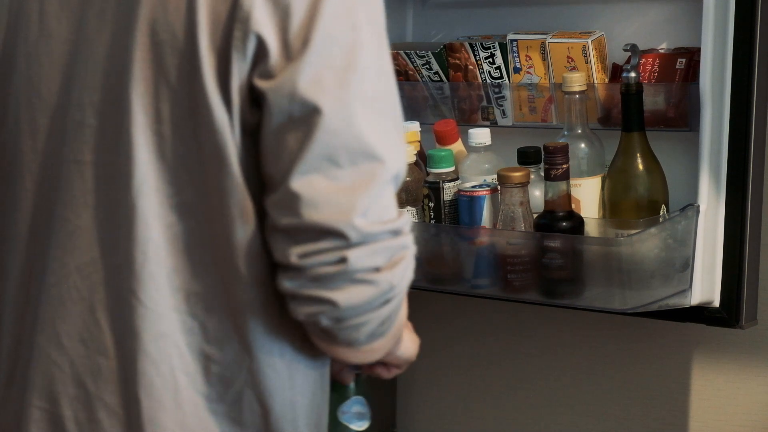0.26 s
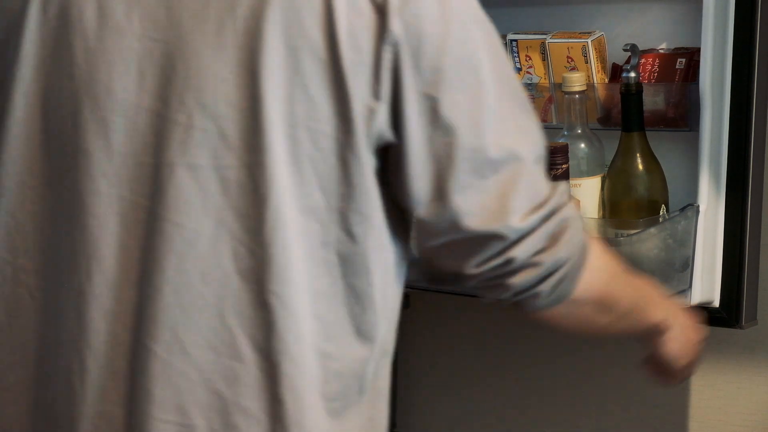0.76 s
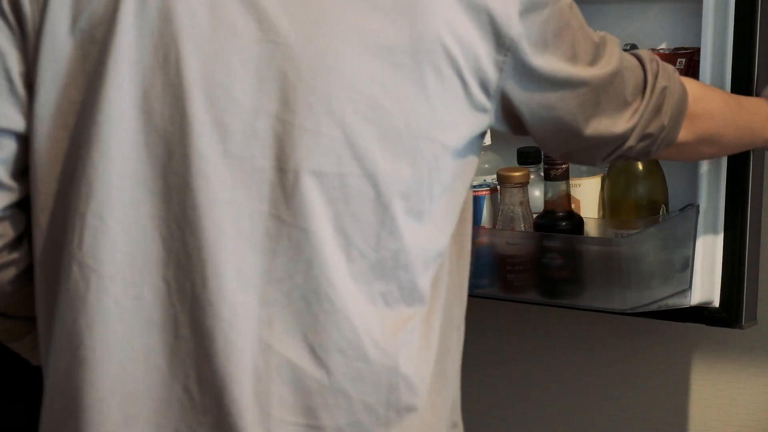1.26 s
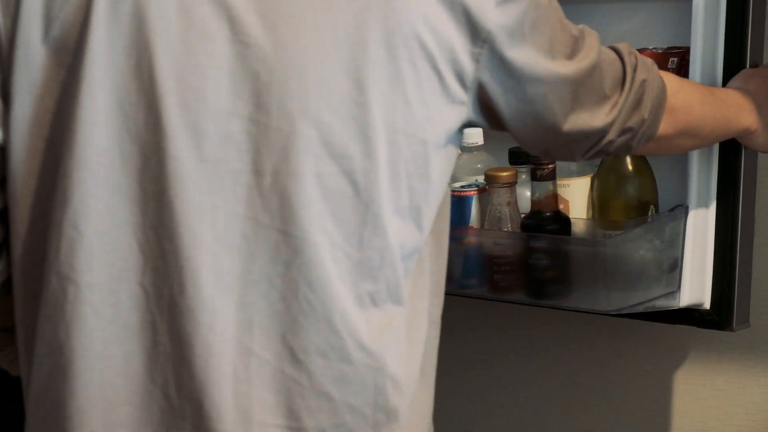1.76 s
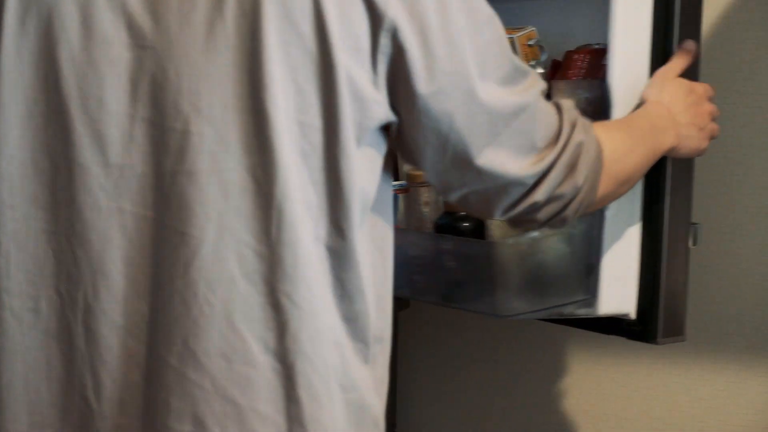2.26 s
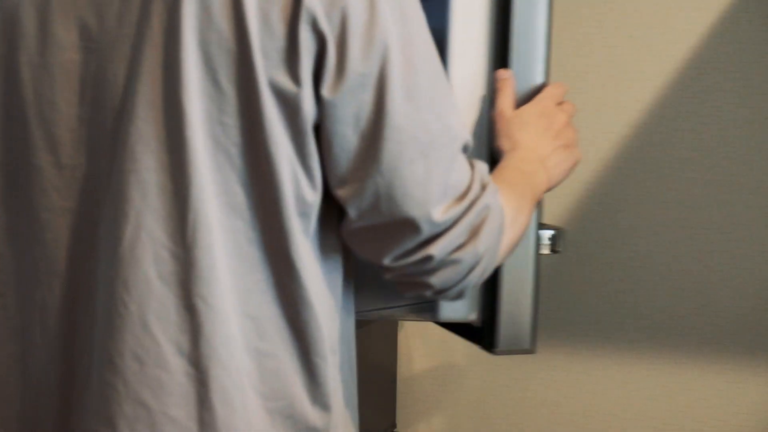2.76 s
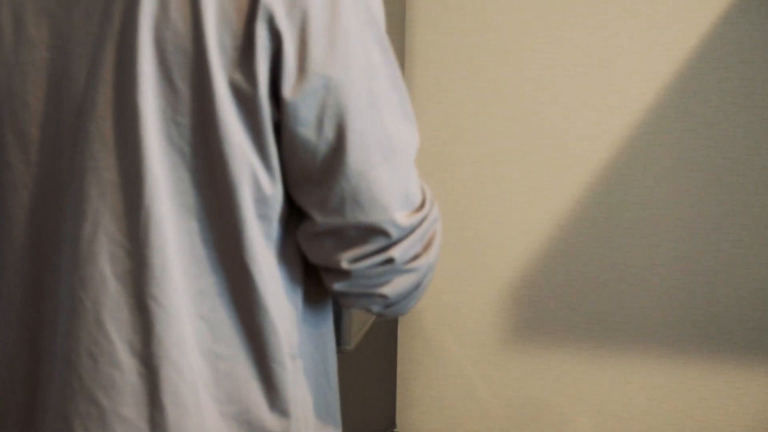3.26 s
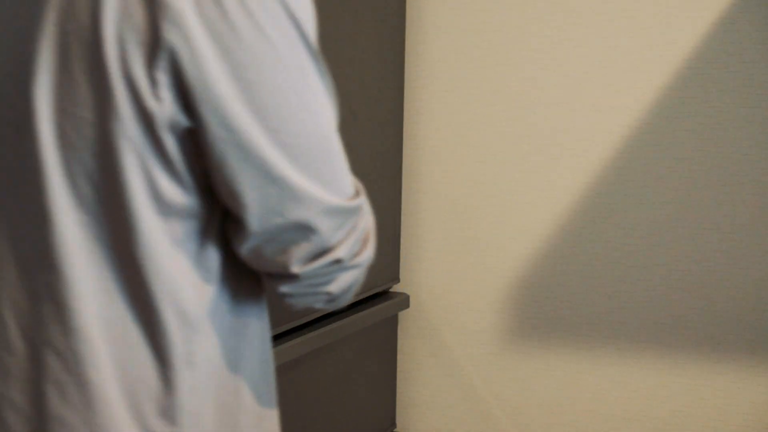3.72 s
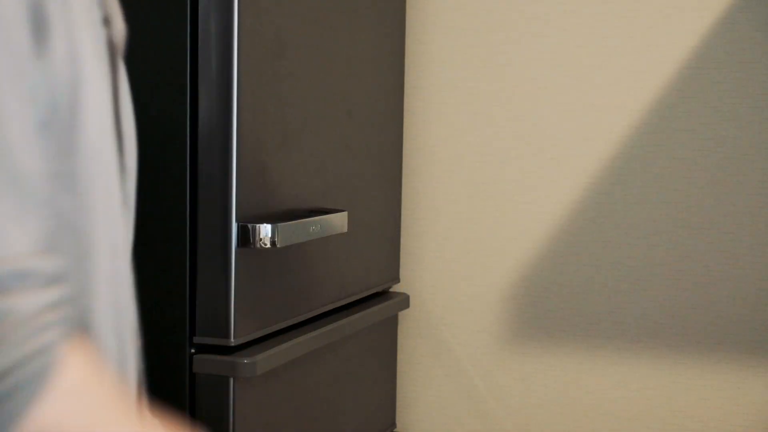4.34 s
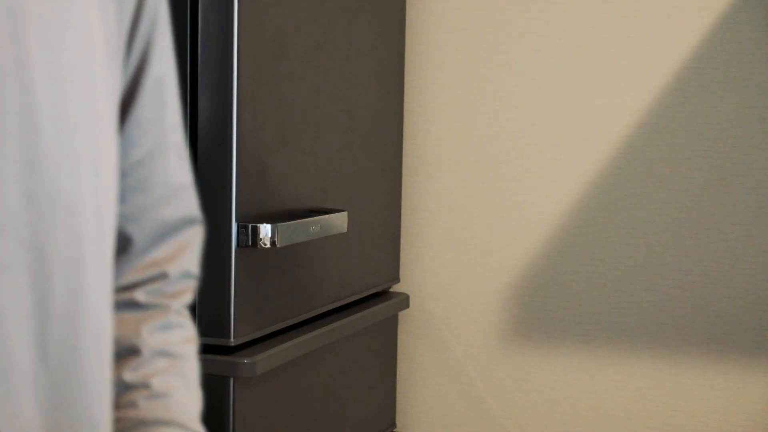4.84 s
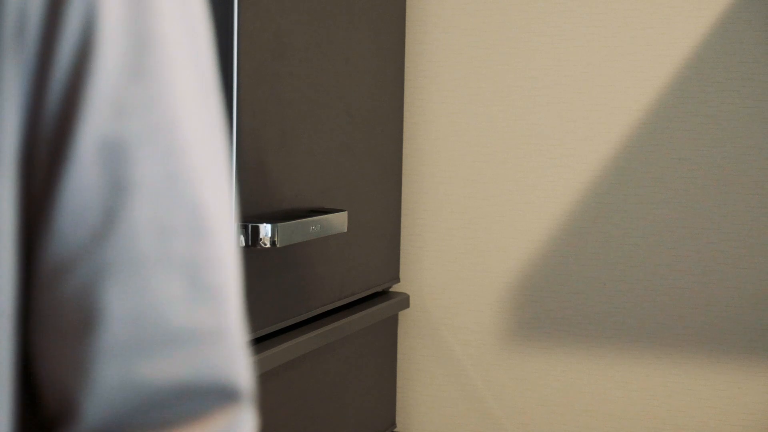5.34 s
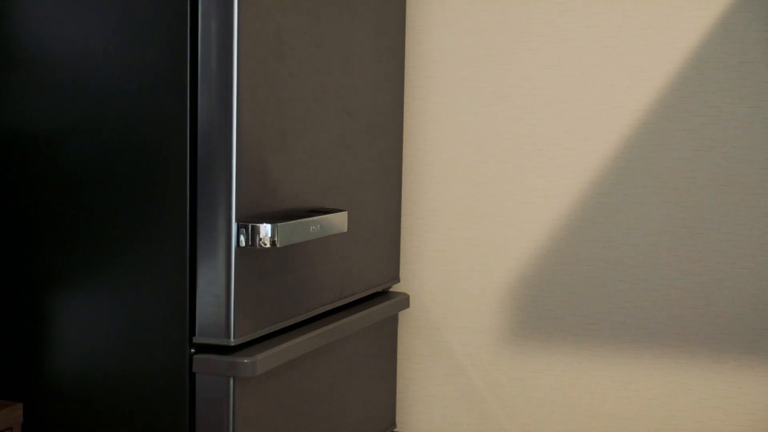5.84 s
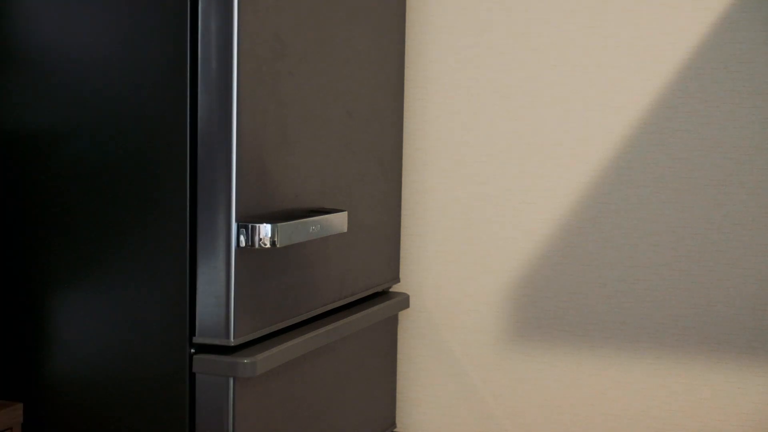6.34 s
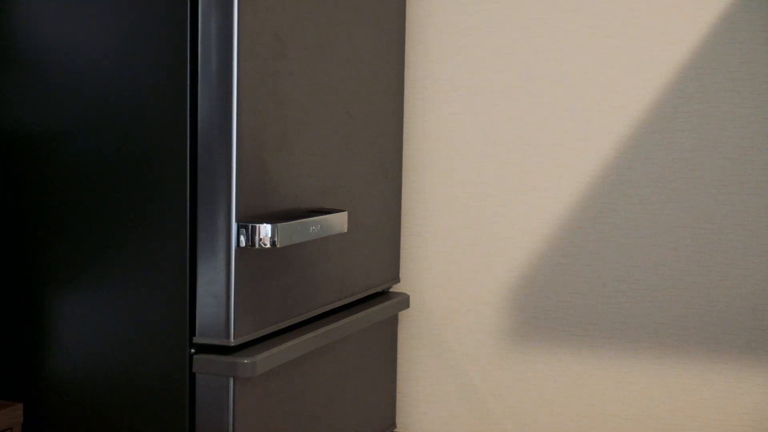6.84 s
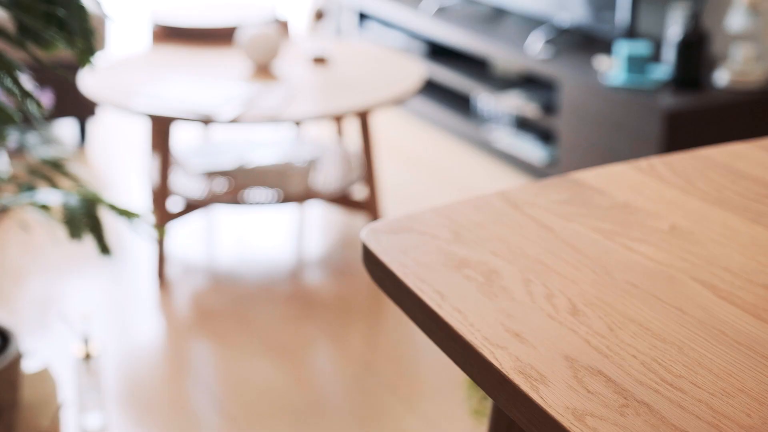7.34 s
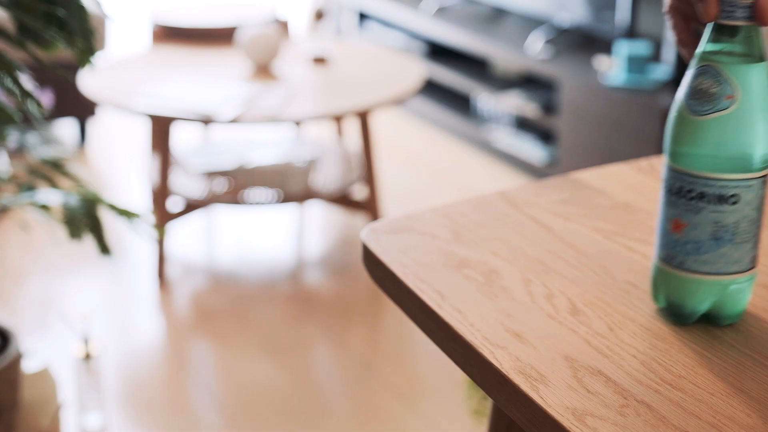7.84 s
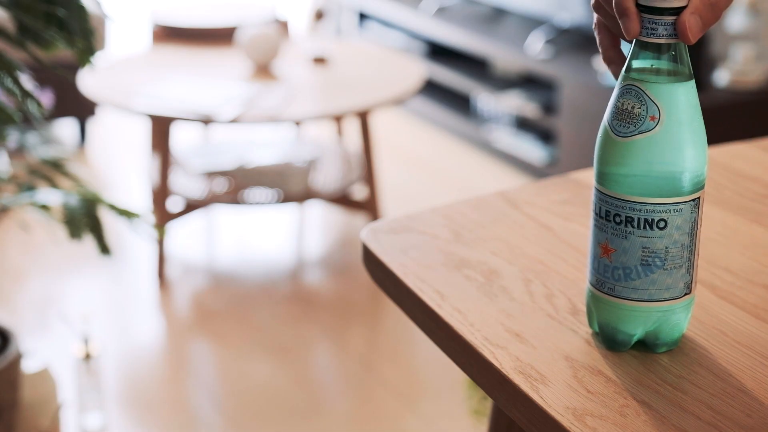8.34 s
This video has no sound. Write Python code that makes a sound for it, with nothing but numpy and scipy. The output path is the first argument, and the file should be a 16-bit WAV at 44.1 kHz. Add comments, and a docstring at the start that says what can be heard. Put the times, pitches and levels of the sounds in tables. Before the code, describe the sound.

Bottle clinks with short glassy rings open the scene, recorded close indoors over soft room tone. More clinks lead into a scraping seal, bright door clacks and a deep cabinet thud with a short boom. Skin squeaks briefly off the door, then come a dull footstep, faint rustling, low air rumble and a dry creak. The room tone becomes louder and hissier as a filled plastic bottle hits a wooden table with a low double thump; muffled bumps end it.

```python
"""Bottles knock in the shelf of a refrigerator door; the door swings to, clacks against its frame and thuds shut.
A hand rubs off the door, then dull bumps, a footstep and rustling clothes sound over a faint hum.
In a second, hissier room a full plastic bottle lands on a wooden table, and dull bumps follow.
Knocks are clicks with dense reflections plus ringing tones that die away; rubbing, rumble and
room tone are shaped noise; the hum is two unsteady sine tones."""
import sys
import numpy as np
from scipy import signal
from scipy.fft import rfft, irfft
from scipy.io import wavfile

SR = 44100
rng = np.random.default_rng(int(sys.argv[2]) if len(sys.argv) > 2 else 0)


def dump_mix(stems):
    """Bounce the given channels to the path in sys.argv[1] as a 16-bit WAV at rate SR."""
    frames = np.atleast_2d(stems).T  # one column per channel
    limited = np.clip(frames, -1, 1)  # hard clip at full scale
    pcm = np.round(limited * 32767).astype(np.int16)
    wavfile.write(sys.argv[1], SR, pcm)


N = 378060
SIZE = 32768  # samples in one short sound
AGE = np.arange(SIZE) / SR  # seconds since a short sound began
FREQ = np.maximum(np.fft.rfftfreq(SIZE, 1 / SR), 1)  # Hz, kept above zero for the logarithms
TIME = np.arange(N) / SR  # seconds since the scene began
FULL_FREQ = np.maximum(np.fft.rfftfreq(N, 1 / SR), 1)  # Hz, for sounds as long as the scene

# Tone colour of hard contact at the door. Each row: frequency in Hz, level in dB.
CLACK_COLOUR = [(90, -8.5), (160, -9.5), (420, -7.5), (1600, -9.5), (2800, -11), (4900, -12.5),
                (6300, -16.5), (8300, -14.5), (15000, -37)]


def undb(db):
    """Turn dB into a plain factor."""
    return 10 ** (np.asarray(db) / 20)


def level(x, db):
    """Scale a steady sound to an rms level."""
    return x * undb(db) / np.sqrt(np.mean(x ** 2))


def blow(x, db):
    """Scale a short sound: its energy spread over a twentieth of a second has this level."""
    return x * undb(db) / np.sqrt(np.sum(x ** 2) * 20 / SR)


def add(out, s, x):
    """Mix x into out from time s (seconds)."""
    start = max(int(s * SR), 0)
    out[start:start + len(x)] += x[:max(N - start, 0)]


def curve(points, hz=FREQ):
    """Join (Hz, dB) points by straight lines on a log-frequency axis."""
    point_hz, point_db = np.transpose(points)
    return np.interp(np.log(hz), np.log(point_hz), point_db)


def edge(ratio, slope):
    """dB of a filter edge at ratio 1: a positive slope (dB per octave) cuts above it, a negative one below."""
    return -10 * np.log10(1 + ratio ** (slope / (10 * np.log10(2))))


def peaks(modes, width_hz):
    """Height 0-1 of an object's resonances at each frequency."""
    return np.max([np.exp(-.5 * ((FREQ - hz) / width_hz) ** 2) for hz, *_ in modes], axis=0)


def colour(x, db):
    """Filter x to the given dB at each frequency, without any sound ahead of its cause."""
    # folding the cepstrum (the spectrum of the log spectrum) makes the filter minimum-phase
    cepstrum = irfft(np.log(undb(db - db.max()) + 1e-4))
    cepstrum[1:SIZE // 2] *= 2
    cepstrum[SIZE // 2 + 1:] = 0
    return irfft(rfft(x, SIZE) * np.exp(rfft(cepstrum)))


def fade(t60):
    """Exponential decay, 60 dB down after t60 seconds."""
    return np.exp(-np.log(1000) * AGE / max(t60, 1e-3))


def ring(modes, scatter_db=0, detune=0):
    """Ringing tones that die away; a blow may shift their levels and pitches at random."""
    chance = rng.standard_normal((len(modes), 2))
    total = 0
    for (hz, db, t60), (level_chance, pitch_chance) in zip(modes, chance):
        tone = np.sin(2 * np.pi * hz * (1 + detune * pitch_chance) * AGE)
        total = total + undb(db + scatter_db * level_chance) * fade(t60) * tone
    return total


def click_in_room(room_db, build_s=0.0012, bend_s=0.000536, t60=0.27, bass_t60=0.37, bass_hz=330):
    """A click on a panel and its dense reflections; the bass lingers longest."""
    noise = rng.standard_normal(SIZE)
    bass = irfft(rfft(noise) / (1 + (FREQ / bass_hz) ** 4))
    tail = (noise - bass) * fade(t60) + bass * fade(bass_t60)
    tail = tail * (1 - np.exp(-AGE / build_s))
    # bending waves carry the treble faster: 1 kHz arrives after bend_s, lower tones later
    click = irfft(np.exp(-4j * np.pi * bend_s * np.sqrt(FREQ * 1000)))
    return blow(click, 0) + blow(tail, room_db)


def soft_blow(modes, swell_s, scuff_db):
    """A soft push swells into low resonances, with a scuff at the contact."""
    # Tone colour of the scuff. Each row: frequency in Hz, level in dB.
    scuff_colour = [(50, 1.5), (150, 3.5), (330, -1), (450, -10), (780, -5), (1050, -17), (4000, -33),
                    (12000, -43)]
    swell = 1 - np.exp(-(AGE / swell_s) ** 2)
    tones = blow(swell * ring(modes), 0)
    scuff = swell * colour(click_in_room(room_db=21), curve(scuff_colour))
    return tones + blow(scuff, scuff_db)


def scrape(modes, swell_s, t60, hiss_db, grain_db=5):
    """A short run of uneven slips that swells, dies away and rings the given modes."""
    slips, sizes = rng.standard_normal((2, SIZE))
    force = slips * undb(grain_db * sizes) * (1 - np.exp(-AGE / swell_s)) * fade(t60)
    rung = signal.fftconvolve(force, ring(modes))[:SIZE]
    hiss = colour(force, curve(CLACK_COLOUR))
    return blow(rung, 0) + blow(hiss, hiss_db)


def walk(rate):
    """Slow random drift with a spread near 1, through rate random points a second."""
    knots = rng.standard_normal(1024)
    return np.interp(TIME * rate, np.arange(len(knots)), knots)


def bottles(ring_db=-4, tilt_hz=1100, tilt_slope=6, low_slope=55, peak_db=4):
    """A bottle touches with a thin tick, then lands fully; bottle and loaded shelf ring along."""
    # Knocks in the door shelf. Each row: start in seconds, level in dB, low edge in Hz, top edge in Hz,
    # slope beyond the top edge in dB per octave (a negative one thins the tones below it instead),
    # pitch of the bottle's body in Hz, its upper ring in Hz,
    # level of the bottle's ring in dB, level of the first touch in dB (both relative to the knock).
    knocks = [(0.1416, -33, 215, 1900, 45, 883, 1390, -3, -8),
              (0.431, -63, 700, 1500, -5, 1120, 1800, -1, -11),
              (1.06, -64, 900, 2400, 15, 1490, 2100, -6, -2),
              (1.386, -36.5, 450, 4500, 26, 1600, 2630, -8, -6),
              (1.389, -32.5, 470, 4700, 25, 1030, 1590, -6, -8),
              (2.746, -40, 720, 1090, 15, 1045, 1136, 2, -19),
              (3.3221, -30.5, 227, 2250, 26, 810, 1039, -3, -7.5),
              (3.6305, -27.5, 258, 1550, 18, 815, 1215, 3, -19.5),
              (3.6932, -37.5, 400, 2500, 6, 1475, 1810, -4, -10),
              (3.715, -43.5, 900, 2800, 2.5, 1470, 1570, -9, -10)]
    # Tones of the loaded shelf. Each row: pitch in Hz, level in dB, time to fall 60 dB in seconds.
    shelf_modes = [(280, -5, .3), (495, -8, .21), (670, -6, .2), (840, 0, .2), (985, -2, .24),
                   (1050, -1, .18), (1195, -3, .15), (1250, -8, .22), (1378, -5, .14), (1498, -6, .2),
                   (1833, -10, .2)]
    contact_s = .00042  # from first touch to full contact; the lighter the touch, the longer it takes
    body_db, body_octaves = 5, 0.15  # height and width of the bottle's resonance
    bottle_t60 = 0.15  # seconds
    out = np.zeros(N)
    panel = edge(FREQ / tilt_hz, tilt_slope) + peak_db * peaks(shelf_modes, width_hz=35)
    tick = edge(1300 / FREQ, slope=28.6) + edge(FREQ / 2430, slope=73)  # a narrow band
    for s, db, low_hz, top_hz, slope, body_hz, upper_hz, bottle_db, touch_db in knocks:
        contact = edge(FREQ / top_hz, slope)
        touch = colour(click_in_room(room_db=-12.5), contact + tick)
        add(out, s, blow(touch, db + touch_db))
        body = body_db * np.exp(-.5 * (np.log2(FREQ / body_hz) / body_octaves) ** 2)
        shape = panel + contact + edge(low_hz / FREQ, low_slope) + body
        # the open door shades the bottles from the room, so the reflections die sooner
        knock = blow(colour(click_in_room(room_db=10.5, t60=0.22), shape), 0)
        shelf = blow(colour(ring(shelf_modes, scatter_db=4, detune=0.0063), shape), ring_db)
        bottle = blow(ring([(body_hz, 0, bottle_t60), (upper_hz, 0, bottle_t60)]), bottle_db)
        add(out, s + contact_s / undb(touch_db), blow(knock + shelf + bottle, db))
    return out


def door(shut_s=3.911, thud_db=-15.0, ring_db=-9, frame_db=-4, push_s=0.017, push_db=-19,
         peak_db=4, boom_db=-25.5, boom_hz=420):
    """Hard clacks of door on frame; the closing door squeezes the air, then the cabinet thuds."""
    # The door meets its frame. Each row: start in seconds, level in dB, top edge in Hz,
    # level of the reflections in dB relative to the click, share of the frame in the ring from 0 to 1.
    clacks = [(3.7975, -20.5, 8600, 5, 0.9), (3.857, -37.5, 14000, 5, 1), (3.912, -18, 10900, 16, 0),
              (3.9133, -22.5, 11100, -1, 0.37), (3.927, -31, 8900, 10, 0)]
    # The next three list the tones of an object.
    # Each row: pitch in Hz, level in dB, time to fall 60 dB in seconds.
    door_modes = [(235, 10, 0.16), (325, 2, 0.45), (449, 12, 0.13), (670, -8, 0.24), (1370, -8.5, 0.38),
                  (1667, 14, 0.16), (3220, -1, 0.22)]  # door panel and trim
    frame_modes = [(687.5, 1, 0.21), (770, 2.5, .15), (974, -1.5, 0.13), (1270, -1, .2), (2034, -1, 0.18),
                   (5020, -12, 0.44)]  # the frame, hard and hollow
    cabinet_modes = [(27, 0, .24), (52, -2, .15), (72, -2, .15), (100, -2, .12), (132, -7, .16),
                     (178, -22, .7)]  # the cabinet and its trapped air
    out = np.zeros(N)
    for s, db, top_hz, room_db, share in clacks:
        frame_peaks = share * peaks(frame_modes, width_hz=120)
        door_peaks = (1 - share) * peaks(door_modes, width_hz=84)
        panel = curve(CLACK_COLOUR) + peak_db * (frame_peaks + door_peaks)
        rung = share * blow(ring(frame_modes), frame_db) + (1 - share) * blow(ring(door_modes), ring_db)
        click = click_in_room(room_db, bend_s=0.000603)
        clack = blow(colour(click, panel + edge(FREQ / top_hz, slope=21)), 0)
        add(out, s, blow(clack + rung, db))
    # air pressure builds ahead of the closing door and collapses as it seats
    lead = shut_s - TIME
    out += undb(push_db) * np.exp(-np.abs(lead) / np.where(lead > 0, push_s, push_s / 10))
    add(out, shut_s, -blow(ring(cabinet_modes), thud_db))
    # the side walls boom into the room, swelling a little later
    boom_band = edge(FREQ / boom_hz, slope=48) + edge(90 / FREQ, slope=4.0)
    walls = colour(click_in_room(room_db=28, build_s=0.062), boom_band)
    add(out, shut_s, blow(walls, boom_db))
    return out


def seal(at_s=3.768, db=-35, hz=31.0, swell_s=0.011, t60=.27, scrape_s=3.763, scrape_db=-40.0):
    """The rubber seal scrapes the frame and sets the trapped air swaying at one low pitch."""
    # Tones of the scraping seal. Each row: pitch in Hz, level in dB, time to fall 60 dB in seconds.
    seal_modes = [(820, -2, 0.037), (1500, -3, 0.026), (3650, -7, .06)]
    out = np.zeros(N)
    add(out, scrape_s, undb(scrape_db) * scrape(seal_modes, swell_s=0.011, t60=0.28, hiss_db=-1.5))
    add(out, at_s, undb(db) * soft_blow([(hz, 0, t60)], swell_s, scuff_db=-19))
    return out


def slides(grain_db=6, slope=22, peak_db=6):
    """Skin sticks and slips on the door: a crackle starts at once, grows and brightens, then dies away."""
    # A hand slides off the door. Each row: start in seconds, length in seconds,
    # level in dB before the growth below, top edge in Hz at full speed.
    hand_slides = [(4.22, .07, -49, 1220), (4.38, 0.02, -39, 2610), (4.415, 0.048, -37, 3020)]
    # Tone colour of the rub. Each row: frequency in Hz, level in dB.
    slide_colour = [(60, 5), (330, 1), (900, 1.5), (1700, -4), (3800, -4.5), (6000, 9), (8800, 23.5),
                    (12000, -5)]
    # Resonances of the handle under a rubbing hand. Each row: pitch in Hz.
    handle_modes = [(810,), (1540,), (2800,)]
    growth_db, opening_octaves, release_t60 = 1.5, 0.32, 0.19  # release in seconds
    out = np.zeros(N)
    handle = curve(slide_colour) + peak_db * peaks(handle_modes, width_hz=160)
    for s, length_s, db, top_hz in hand_slides:
        slips, sizes = rng.standard_normal((2, SIZE))
        crackle = slips * undb(grain_db * sizes)
        dull = colour(crackle, handle + edge(FREQ * 2 ** opening_octaves / top_hz, slope))
        bright = colour(crackle, handle + edge(FREQ / top_hz, slope))
        speed = np.minimum(AGE / length_s, 1)
        rub = level((1 - speed) * dull + speed * bright, db)
        growth = undb(growth_db * (speed - 2))
        release = np.interp(AGE - length_s, AGE, fade(release_t60))
        add(out, s, rub * growth * release)
    return out


def table(low_hz=36):
    """The heavy bottle drives the table top's tones; its plastic feet add a dull tap."""
    # The bottle lands on one foot, then flat. Each row: start in seconds, level in dB,
    # top edge in Hz, level of the tap in dB relative to the wood.
    landings = [(7.3039, -19, 1170, -9), (7.316, -14, 450, -15.5)]
    # Tones of the wooden table. Each row: pitch in Hz, level in dB, time to fall 60 dB in seconds.
    table_modes = [(51, 2.5, 0.26), (77, 4, 0.091), (141, -11, 0.47), (172.5, -15, 0.42),
                   (212, -15.5, 0.36), (256, -3, 0.15), (470, -19.5, 0.23), (1065, -21, 0.22),
                   (1406, -22, 0.29)]
    # Tone colour of the tap. Each row: frequency in Hz, level in dB.
    tap_colour = [(100, -5), (220, 5), (330, -4), (480, -2), (600, -16), (850, -9), (1100, -8), (1480, -21),
                  (1680, -33), (8000, -54)]
    out = np.zeros(N)
    for s, db, top_hz, tap_db in landings:
        band = edge(FREQ / top_hz, slope=16.4) + edge(low_hz / FREQ, slope=14)
        wood = blow(colour(ring(table_modes), band), db)
        tap = colour(click_in_room(room_db=26, build_s=0.0043), curve(tap_colour))
        add(out, s, blow(tap, db + tap_db) - wood)
    return out


def footstep():
    """Heel and sole press on the same floorboards, which swell softly into their low tones."""
    # One firm footstep, heel then sole. Each row: start in seconds, level in dB,
    # swell in seconds, level of the scuff in dB relative to the tones.
    footfalls = [(5.444, -27.5, 0.0049, -9.5), (5.495, -38.5, 0.012, -18)]
    # Tones of the floorboards. Each row: pitch in Hz, level in dB, time to fall 60 dB in seconds.
    board_modes = [(152.4, 3.5, 0.15), (201, 1, 0.13), (253.4, -10, .14), (346, -10, 0.097)]
    out = np.zeros(N)
    for s, db, swell_s, scuff_db in footfalls:
        add(out, s, -undb(db) * soft_blow(board_modes, swell_s, scuff_db))
    return out


def bumps(swell_cycles=0.99, ring_cycles=28.3):
    """Each bump sounds one low resonance; lower (heavier) ones swell and ring for longer."""
    # Dull bumps of feet, hands and furniture. Each row: start in seconds, level in dB,
    # pitch in Hz, level of the scuff in dB relative to the tone.
    dull_bumps = [(2.04, -47, 65.7, -2.5), (4.235, -45.5, 138, -4), (4.412, -49.5, 126, 6.5),
                  (4.652, -51, 180, -2), (5.10, -49, 164.4, -6), (5.961, -39, 75, -22),
                  (6.885, -50, 105, -1), (7.445, -34.5, 98.3, -23), (7.938, -45, 164, -2),
                  (7.955, -29, 84.5, -30), (8.362, -35.5, 112.3, -20)]
    out = np.zeros(N)
    for s, db, hz, scuff_db in dull_bumps:
        # rise and fall last a set number of cycles of the pitch
        bump = soft_blow([(hz, 0, ring_cycles / hz)], swell_cycles / hz, scuff_db)
        add(out, s, undb(db) * bump)
    return out


def creak(at_s=6.894, db=-49):
    """One dry floorboard creak as the weight shifts: uneven slips ring the wood."""
    # Tones of the creak. Each row: pitch in Hz, level in dB, time to fall 60 dB in seconds.
    creak_modes = [(730, 0, 0.09), (3175, 0.5, 0.043), (3630, -3, 0.087)]
    out = np.zeros(N)
    add(out, at_s, undb(db) * scrape(creak_modes, swell_s=0.0044, t60=0.12, hiss_db=-3))
    return out


def rustles(grain_db=3, linger=1.31):
    """Rubbing cloth: tiny slips of uneven size that swell and die away."""
    # Sleeves and soles brush. Each row: time of the peak in seconds, half length in seconds,
    # level in dB at the peak, centre in Hz, half width in octaves.
    brushes = [(4.667, 0.013, -56.5, 4000, 0.68), (5.214, 0.11, -60, 4600, 1.8),
               (5.505, 0.053, -54.5, 1490, 0.86), (6.176, 0.017, -53, 2700, 0.94),
               (6.518, 0.024, -48, 5330, 0.43), (6.765, 0.023, -56.5, 5200, 0.79),
               (6.857, 0.014, -56, 3900, .45), (6.901, 0.02, -52, 3600, 0.7),
               (7.242, 0.019, -54.5, 4250, 0.61)]
    out = np.zeros(N)
    middle_s = AGE.mean()
    offset = AGE - middle_s
    for s, half_s, db, hz, octaves in brushes:
        slips, sizes = rng.standard_normal((2, SIZE))
        rub = colour(slips * undb(grain_db * sizes), -3 * (np.log2(FREQ / hz) / octaves) ** 2)
        width_s = half_s * np.where(offset > 0, linger, 1 / linger)  # slower to die than to rise
        swell = np.exp(-.5 * (offset / width_s) ** 2)
        add(out, s - middle_s, level(rub, db) * swell)
    return out


def rumble(db=1):
    """Low noise comes and goes as the body moves past close by."""
    # Course of the rumble. Each row: time in seconds, level in dB before db is added.
    rumble_course = [(5.0, -76), (5.02, -50.5), (5.4, -57), (5.45, -41), (5.87, -70), (5.99, -35),
                     (6.14, -33), (6.34, -56), (6.62, -58), (6.82, -40), (7.02, -46), (7.2, -51)]
    # Tone colour of the rumble. Each row: frequency in Hz, level in dB.
    rumble_colour = [(10, 8), (25, 2), (45, 0.5), (65, -13), (100, -14), (200, -32), (600, -53)]
    noise = irfft(rfft(rng.standard_normal(N)) * undb(curve(rumble_colour, FULL_FREQ)), N)
    s, rumble_db = np.transpose(rumble_course)
    return level(noise, db) * np.interp(TIME, s, undb(rumble_db), left=0, right=0)


def draught(at_s=5.614, half_s=0.22, db=-36, top_hz=14):
    """Slow puffs of air as the body passes close by: very low noise that swells and fades."""
    band = signal.butter(3, [top_hz / 2, top_hz], "band", fs=SR, output="sos")
    puffs = signal.sosfilt(band, rng.standard_normal(N))
    return level(puffs, db) * np.exp(-.5 * ((TIME - at_s) / half_s) ** 2)


def hum(waver_db=4.0, drift=0.12):
    """Faint motor tones whose phase and level drift slowly."""
    # Refrigerator hum. Each row: pitch in Hz, rms level in dB.
    hum_lines = [(301, -71), (450, -66.5)]
    total = np.zeros(N)
    for hz, db in hum_lines:
        line = np.sin(2 * np.pi * hz * TIME + drift * walk(rate=3.0))
        total += level(line * undb(waver_db * walk(rate=3.01)), db)
    return total


def air(points, db, waver_db):
    """Room tone: the bass wavers and is alike in both ears, the fine hiss spreads to the sides."""
    # Stereo width of room tone. Each row: frequency in Hz, side minus middle in dB.
    spread = [(60, -15), (700, -7), (3000, -1.5)]
    shape = undb(curve(points, FULL_FREQ) + edge(10 / FULL_FREQ, slope=85))
    mid, side = rfft(rng.standard_normal((2, N))) * shape
    bass = mid / (1 + (FULL_FREQ / 120) ** 2)
    centre = irfft(mid - bass, N) + irfft(bass, N) * undb(waver_db * walk(rate=7))
    sides = irfft(side * undb(curve(spread, FULL_FREQ)), N)
    return level(centre + np.array([[1], [-1]]) * sides, db)


def scene():
    """Kitchen tone gives way to the second room; all the knocks sound from the centre."""
    # Tone colour of the two rooms. Each row: frequency in Hz, level in dB.
    kitchen_colour = [(20, 14.5), (45, -3.5), (85, -1), (160, -7), (230, -5.5), (310, -3.5), (520, -7.5),
                      (1000, -13.5), (3000, -18.5), (15500, -22)]
    lounge_colour = [(20, 3), (60, -6), (130, -18), (270, -27), (390, -23.5), (1000, -31.5), (15500, -37)]
    lounge_from_s = 7.23  # middle of a crossfade lasting a twentieth of a second
    moved = np.clip((TIME - lounge_from_s) * 20 + .5, 0, 1)
    kitchen = air(kitchen_colour, db=-52, waver_db=4.5) + hum()
    lounge = air(lounge_colour, db=-40.5, waver_db=7.5)
    tone = np.sqrt(1 - moved) * kitchen + np.sqrt(moved) * lounge
    fridge = bottles() + seal() + door() + slides()
    body = bumps() + footstep() + creak() + rustles() + rumble() + draught()
    return tone + fridge + body + table()


def record(dry):
    """Peaks beyond 0.88 are clipped; the treble above 15.8 kHz is cut steeply."""
    top_cut = signal.ellip(12, .1, 80, 15800, fs=SR, output="sos")
    return signal.sosfilt(top_cut, np.clip(dry, -.88, .88))


dry = scene()
out = record(dry)
dump_mix(out)
```